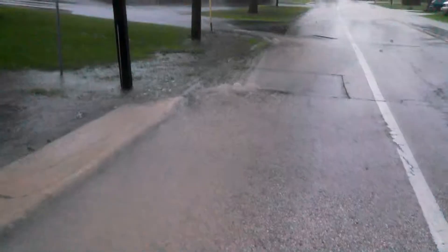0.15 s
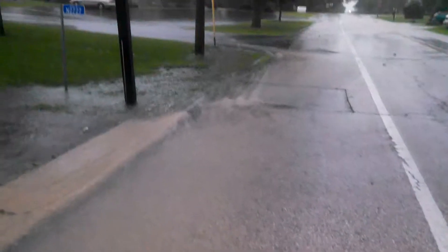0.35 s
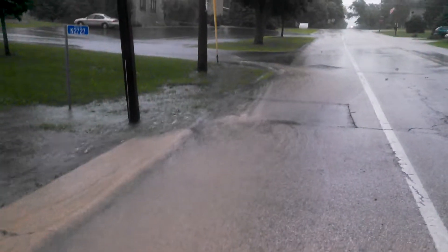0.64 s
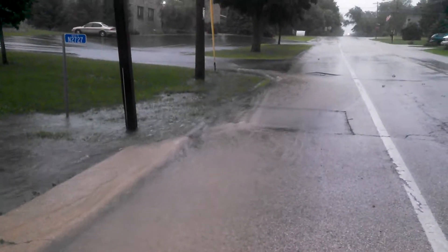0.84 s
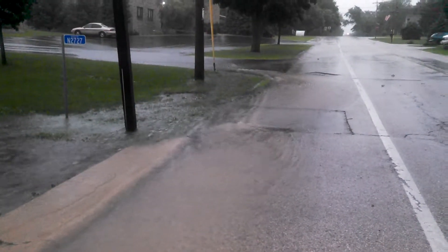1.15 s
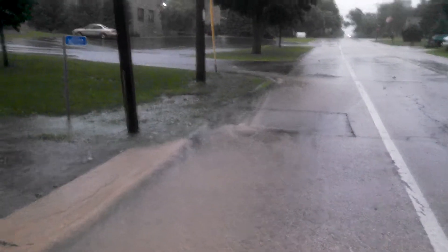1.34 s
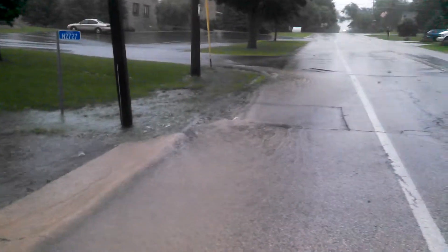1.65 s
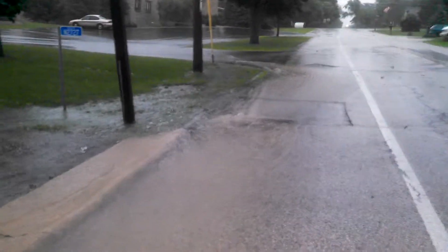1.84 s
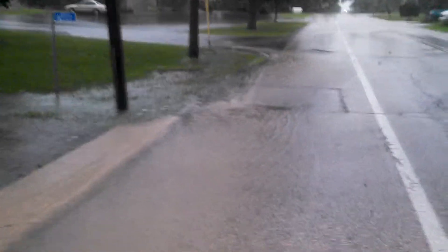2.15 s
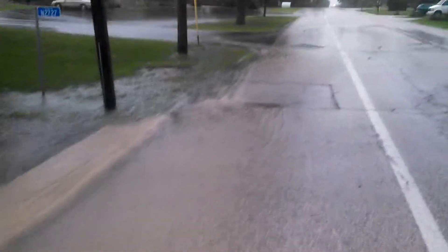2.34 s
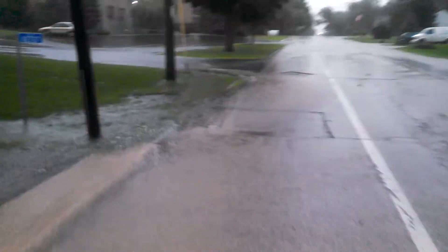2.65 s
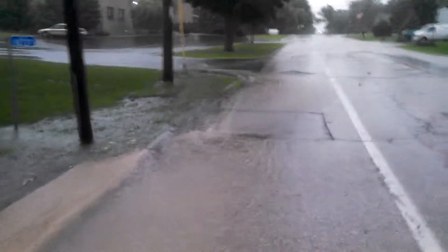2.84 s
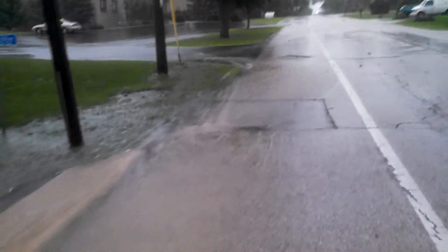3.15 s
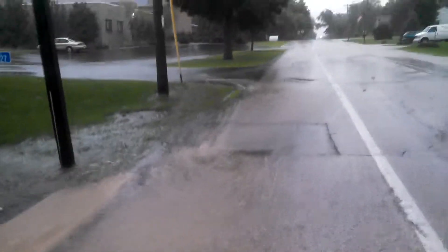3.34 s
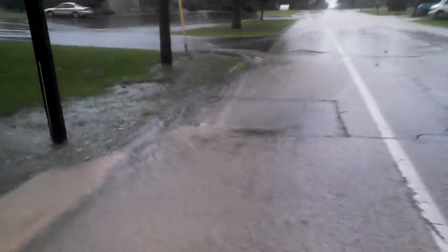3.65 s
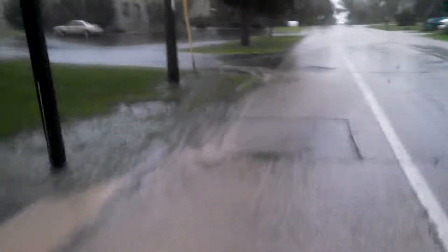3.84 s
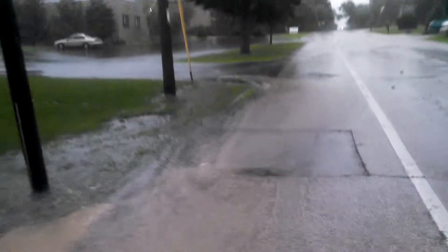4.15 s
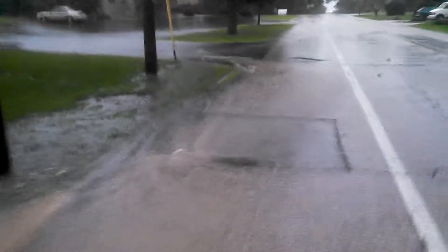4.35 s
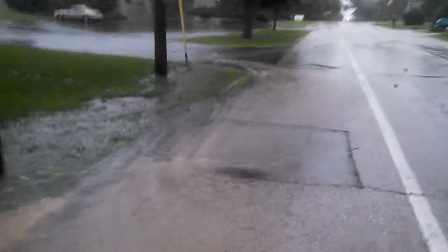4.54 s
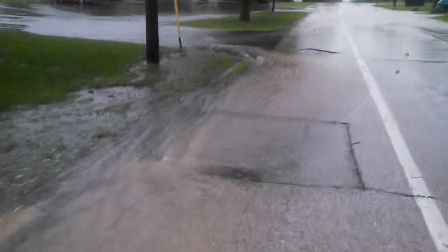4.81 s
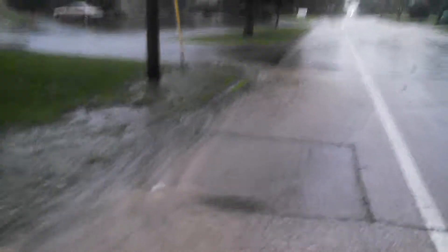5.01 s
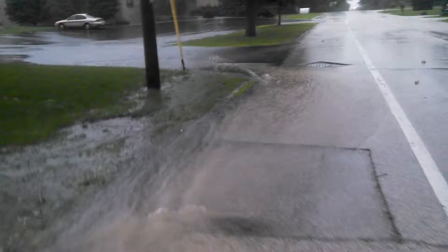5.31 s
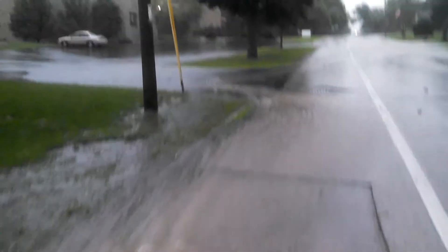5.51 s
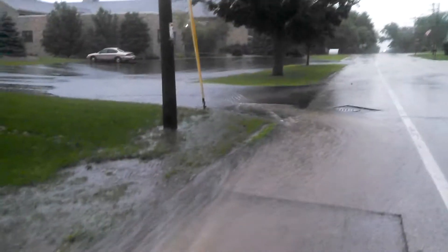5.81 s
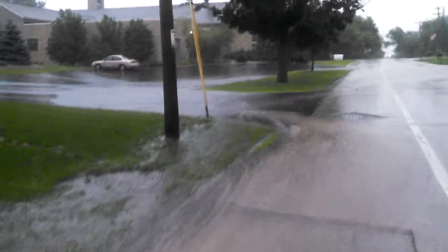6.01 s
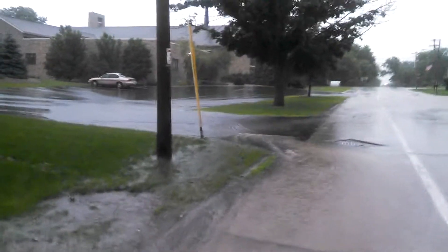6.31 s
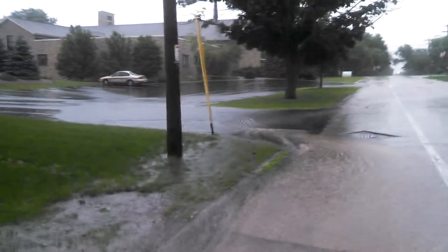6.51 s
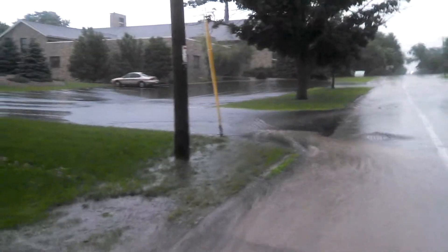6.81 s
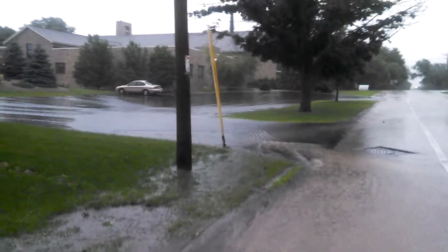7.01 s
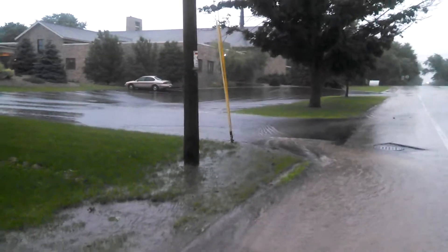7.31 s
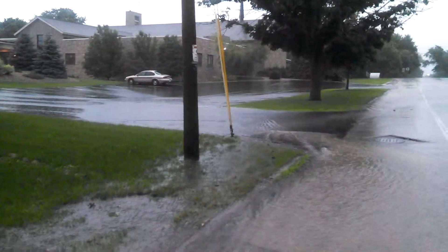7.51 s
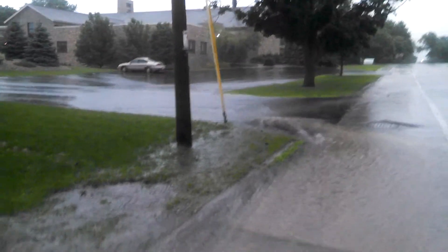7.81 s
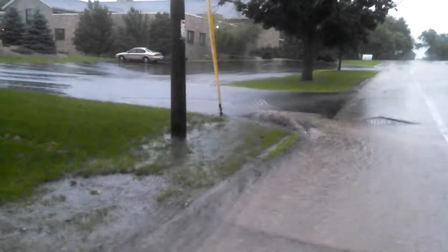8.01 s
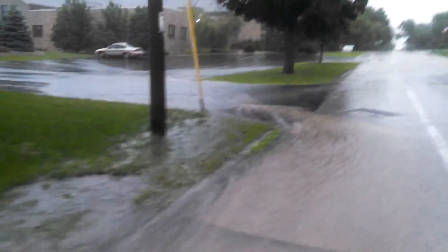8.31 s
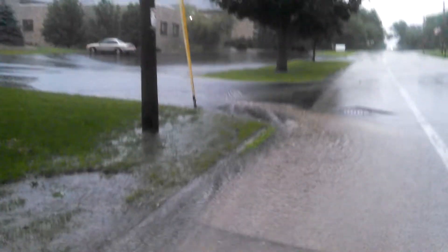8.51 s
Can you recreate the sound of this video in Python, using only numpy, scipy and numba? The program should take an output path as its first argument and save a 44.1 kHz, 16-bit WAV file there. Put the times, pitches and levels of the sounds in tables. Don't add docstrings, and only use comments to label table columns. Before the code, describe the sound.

A short silence, then heavy rain bursts in at full strength. Dense small drops drum on umbrella cloth right over the microphone, with irregular hard thuds, ticks and occasional bright spray from the rim. A steady hiss of rain on flooded road and grass surrounds it, and low wind puffs bump the microphone. The hardest drop, past the middle, briefly pushes the level down.

```python
import sys
import numpy as np
from scipy import signal
from scipy.fft import rfft, irfft
from scipy.io import wavfile
from scipy.ndimage import uniform_filter1d
from numba import njit

SR = 44100
rng = np.random.default_rng(int(sys.argv[2]) if len(sys.argv) > 2 else 0)


def to_wav(sig):
    pcm = np.clip(np.atleast_2d(sig), -1, 1) * 32767
    pcm = np.round(pcm).astype(np.int16)
    wavfile.write(sys.argv[1], SR, pcm.T)


def linear_from_db(decibels):
    return 10 ** (np.asarray(decibels, float) / 20)


N = 381906
T = np.arange(N) / SR
HZ = np.maximum(np.arange(N // 2 + 1) * SR / N, 1)
START_S = .7657
LEFT_LAG = 18


def along(table, column):
    table = np.array(table, float)
    return np.interp(np.log(HZ), np.log(table[:, 0]), table[:, column])


def colour(x, table):
    return irfft(rfft(x) * linear_from_db(along(table, 1)), N)


def unit(x, lo_hz, hi_hz):
    power = np.abs(rfft(x)[(HZ > lo_hz) & (HZ < hi_hz)]) ** 2
    return x * N / np.sqrt(2 * power.sum())


def walk(rate):
    hold = int(SR / rate)
    steps = np.repeat(rng.standard_normal(N // hold + 1), hold)
    return 1.32 * uniform_filter1d(uniform_filter1d(steps, hold), hold)[:N]


@njit
def grains(s, hz, cycles, size, rise):
    out = np.zeros(N + 8192)
    for k in range(len(s)):
        w = 2 * np.pi * hz[k] / SR
        first = max(int(s[k] * SR - rise / w), 0)
        fade = np.exp(-hz[k] / (cycles * SR))
        env = size[k]
        for n in range(min(int((6 * cycles * 2 * np.pi + rise) / w), 6000)):
            if n * w > rise:
                env *= fade
            out[first + n] -= np.sin(n * w) * env * min(n * w / rise, 1.) ** .7
    return out[:N]


def thuds(s, db, hz, ring, ripple_db, ripple_s, facing, count=7):
    chance = rng.random((len(s), count, 3))
    late = ripple_s * (.2 - np.log(1 - .98 * chance[..., 0]))
    late[:, 0] = 0
    back = linear_from_db(ripple_db) * np.exp(-late / ripple_s / 3.16) * (2 * chance[..., 1] - 1)
    back[:, 0] = 1 if facing else 0.23 * back[:, 0]
    pitch = hz[:, None] * 2 ** (1.5 * (chance[..., 2] - .45) * (late > 0))
    when = np.clip(s[:, None] + late, 0, N / SR)
    size = linear_from_db(db)[:, None] * back
    return grains(when.ravel(), pitch.ravel(), 1. * ring, size.ravel(), 1.5 * np.pi)


# time in seconds, patter level in dB, wind level in dB.
WEATHER = [(.77, -28, -47), (1.1, -27.5, -48), (1.4, -29, -46), (1.73, -30.5, -47.5), (2.2, -25, -47),
           (2.55, -28, -49), (3.1, -32, -50), (3.34, -29, -45), (3.65, -31.5, -54), (4.3, -30.5, -50),
           (4.66, -29.5, -52), (4.9, -30, -60), (5.24, -28, -50), (5.7, -31, -52), (6.1, -26.5, -56),
           (6.95, -30.5, -54), (7.5, -28.5, -49.5), (8.66, -30.5, -51)]


def weather():
    s, patter_db, wind_db = np.transpose(WEATHER)
    return np.interp(T, s, patter_db), np.interp(T, s, wind_db)


def small_drops():
    chance = rng.random((2400, 3)).T
    return chance[0] * N / SR, -5.0 * np.log(1 - .88 * chance[1]), 560 * 2 ** (1.8 * chance[2])


def patter(s, db, hz, facing):
    taps = thuds(s, db, hz, ring=.4, ripple_db=-5, ripple_s=.003, facing=facing, count=4)
    return unit(taps, 400, 2000)


# frequency in Hz, level in dB per Hz.
HISS_SPECTRUM = [(60, 0.5), (170, 0), (400, 3), (1000, 2), (2000, -4.5), (3500, -4), (5000, -7.5),
                 (7400, -14), (10000, -18.5), (14000, -23.5), (16000, -53)]


def hiss():
    tick_size = linear_from_db(-3.0 * np.log(1 - .9 * rng.random(N)))
    ticks = rng.standard_normal(N) * tick_size * (rng.random(N) < .03)
    noise = rng.standard_normal(N) + 0.74 * ticks / ticks.std()
    bins = rfft(colour(noise, HISS_SPECTRUM))
    swell, out = walk(30), 0
    for octave in range(6, 15):
        band = np.clip(1 - np.abs(np.log2(HZ) - octave), 0, 1)
        out = out + irfft(bins * band, N) * linear_from_db(1.4 * swell + 1.08 * walk(35))
    return unit(out, 7780, 9740)


# peak time in seconds, peak level in dB, pitch in Hz.
WIND_BUMPS = [(1.101, -12, 89), (1.258, -21, 93), (1.308, -17, 87), (1.457, -13, 80), (2.491, -14, 86),
              (3.181, -27, 80.9), (3.245, -12, 87), (3.298, -6, 103), (4.2, -21, 88), (4.395, -17, 122),
              (4.832, -15, 88), (4.996, -15, 74), (5.204, -14, 88), (5.256, -16, 70), (5.296, -6, 100),
              (5.343, -19, 81), (5.752, -9, 99), (8.2, -21, 80)]


def wind(db):
    flutter = [(25, -50), (50, -19.0), (85, 4.0), (140, -18), (260, -8), (600, -37.0)]  # Hz, dB
    air = colour(rng.standard_normal((2, N)), flutter)
    air = air * linear_from_db(db + 3.0 * walk(15)) / np.std(air)
    s, bump_db, hz = np.transpose(WIND_BUMPS)
    right = air[0] + grains(s, hz, 0.41, linear_from_db(bump_db - 6.0), 3.5 * np.pi)
    left = -.53 * np.roll(right, LEFT_LAG) + 0.11 * air[1]
    return np.array([left, right])


def big_drops(s, db, hz, facing):
    body = thuds(s, db, hz, ring=0.58, ripple_db=-3.5, ripple_s=.004, facing=facing)
    tick = thuds(s - .0001, db - 7, 2.1 * hz, ring=.5, ripple_db=-8, ripple_s=.0025, facing=True)
    sag = thuds(s + 0.0027, db - 13.5, 300 + 0 * hz, ring=0.69, ripple_db=0.0, ripple_s=0.00616,
                facing=facing, count=3)
    spray = thuds(s, db - 26, 6500 + 0 * hz, ring=0.37, ripple_db=17, ripple_s=0.0017, facing=facing)
    return body + tick + sag + spray


def strays(hard_s, count=165):
    over_patter_db, scatter_db, centre_hz, spread_octaves = 17.5, 6.5, 1014, 0.23
    hush_s = .014
    chance = rng.random((count, 2)).T
    s = START_S + (np.arange(count) + chance[0]) / count * (N / SR - START_S)
    db = np.interp(s, *np.transpose(WEATHER)[:2]) + over_patter_db + scatter_db * (2 * chance[1] - 1)
    hz = centre_hz * 2 ** (spread_octaves * rng.standard_normal(count))
    alone = np.abs(s[:, None] + hush_s / 2 - hard_s).min(axis=1) > hush_s
    return np.array([s, db, hz])[:, alone]


# time in seconds, peak level in dB, thud pitch in Hz.
HARD_DROPS = [(0.776, -12, 900), (0.8571, -8.5, 1090), (1.101, -5.5, 960), (1.1533, -9.5, 1370),
              (1.1903, -8, 760), (1.2509, -8.5, 1030), (1.2814, -4, 990), (1.6408, -8, 1140),
              (1.8313, -7.5, 970), (2.0077, -8, 1020), (2.0927, -7, 960), (2.2691, -7, 880),
              (2.4959, -5.5, 1034), (2.822, -9, 1070), (2.9519, -7, 940), (3.251, -4.5, 785.4),
              (3.5872, -3.5, 990), (3.6362, -7, 950), (3.7715, -9, 950), (3.8377, -10, 940),
              (4.0499, -6, 1018), (4.2922, -6.5, 1000), (4.483, -7, 1220), (4.7998, -8, 880),
              (5.4012, -9, 1290), (6.3759, -4, 930), (7.1053, -6.5, 1020), (7.137, -6, 987),
              (7.4632, -5.5, 1020), (8.2852, -11, 1120)]
# time in seconds, peak level in dB.
SLACK_DROPS = [(.8076, -13), (.8822, -9), (1.0791, -10.5), (1.7874, -9), (1.8643, -7.5), (2.1145, -12),
               (2.1526, -9.7), (2.1926, -6.5), (2.2165, -10), (2.248, -11.5), (2.3786, -10), (3.205, -13.5),
               (3.891, -8), (3.9747, -7), (4.1989, -11.5), (4.3415, -10.5), (4.5596, -6), (5.2611, -10),
               (5.4451, -8.5), (5.962, -9), (6.1064, -8), (7.2716, -13), (7.3243, -6.5), (7.5993, -14),
               (7.6749, -10.5), (7.7108, -7.5), (7.8475, -9.5), (7.9368, -7), (8.118, -9), (8.509, -13)]
# time in seconds, thud level in dB, thud pitch in Hz, burst level in dB.
RIM_DROPS = [(1.2649, -4.5, 880, -25), (1.3408, -12, 1310, -23), (1.4793, -11.5, 1000, -15),
             (1.6604, -9.5, 1230, -24), (2.5499, -6.5, 760, -22), (2.559, -6.5, 980, -26),
             (2.7734, -5.5, 1000, -18), (2.894, -3.5, 890, -27), (3.3376, -2.2, 740, -27),
             (3.939, -7, 970, -27), (3.946, -12, 893, -28), (4.1282, -11.5, 1610, -35),
             (4.3921, -9, 358, -42), (4.5939, -6.5, 1070, -29), (4.6204, -9, 1280, -28),
             (4.658, -8.5, 1130, -28), (4.7288, -11.5, 840, -19), (4.933, -9, 960, -17),
             (5.3006, -6.5, 1030, -28), (5.5812, -11.5, 794, -22), (5.7378, -4, 740, -26),
             (5.7515, 4.5, 710, -13), (6.0515, -10, 1160, -23), (6.5015, -6.5, 980, -23),
             (6.643, -7, 961, -28), (6.7092, -9, 1090, -22), (7.0011, -6, 880, -18),
             (7.5751, -9.5, 1140, -23), (8.2057, -7, 1291, -19), (8.261, -22, 1190, -19.5)]


def all_drops():
    slack = np.transpose([(s, db, 740) for s, db in SLACK_DROPS])
    hard = np.hstack([np.transpose(HARD_DROPS), np.transpose(RIM_DROPS)[:3], slack])
    return np.hstack([hard, strays(hard[0])])


def rim_bursts():
    s, _, _, burst_db = np.transpose(RIM_DROPS)
    return s, burst_db, 4530 * 2 ** (0.4 * rng.random(len(s)))


def splashes(s, db, hz):
    ring = thuds(s, db + 2.5, hz, ring=2.0, ripple_db=2, ripple_s=0.00091, facing=True)
    spray = thuds(s - .001, db + 3, 11000 + 0 * hz, ring=0.64, ripple_db=-3, ripple_s=.0018, facing=False)
    return ring + spray


# frequency in Hz, gain in dB.
CLOTH_TONE = [(60, -22), (150, 1.5), (300, -0.5), (900, -1.5), (1500, 0), (2500, 3.5), (4000, 9.5),
              (8000, -4), (14000, 5)]


def through_cloth(x):
    return colour(x, CLOTH_TONE)


# frequency in Hz, gain in dB, phase in radians, likeness from 0 to 1.
PORT_MATCH = [(100, -6, -2.4, .7), (350, -8.2, -1.7, .55), (600, -6.5, -1.25, .72), (1000, -5.5, -.45, .86),
              (1250, -3.4, .1, .96), (1600, -.5, .62, .97), (1900, 1.5, .7, .85), (2300, .6, .2, .66),
              (2900, .1, .2, .84), (5000, .1, .1, .8), (6500, 0, 0, 1)]


def two_ports(near, other):
    like = np.clip(along(PORT_MATCH, 3), 0, 1)
    mixed = like * rfft(near) + np.sqrt(1 - like ** 2) * rfft(other)
    turn = along(PORT_MATCH, 2) - 2 * np.pi * HZ * LEFT_LAG / SR
    path = -linear_from_db(along(PORT_MATCH, 1)) * np.exp(1j * turn)
    return np.array([irfft(mixed * path, N), near])


def scene():
    patter_db, wind_db = weather()
    hiss_db = -48.5 + 0.53 * (patter_db + 29.5)
    small, drops, bursts = small_drops(), all_drops(), rim_bursts()
    ports = []
    for facing in (True, False):
        struck = big_drops(*drops, facing) + linear_from_db(patter_db - 0.5) * patter(*small, facing)
        ports.append(through_cloth(struck) + linear_from_db(hiss_db) * hiss() + splashes(*bursts))
    return two_ports(*ports) + wind(wind_db + 9)


# time in seconds, depth in dB, recovery in seconds.
LIMITER_DIVES = [
    (3.3405, -8, .008),
    (5.7532, -26, .012),
]


def limiter():
    return sum(db * np.exp(-np.maximum(T - s, 0) / back_s) * (T > s) for s, db, back_s in LIMITER_DIVES)


# time in seconds, depth in dB.
GAIN_FALLS = [(0.767, -5.5), (2.28, -4), (2.561, -3.5), (2.9, 1.5), (3.344, -6.5), (4.8, -3.5),
              (5.755, -11.5)]


def gain_control():
    falls = [np.minimum(db + 10 * (T - s), 0) * (T > s) for s, db in GAIN_FALLS]
    return np.min(falls, axis=0)


def roll_off(x):
    return signal.sosfilt(signal.butter(12, 15700, fs=SR, output="sos"), x)


def record(dry):
    clipped = np.clip(dry * linear_from_db(limiter() + gain_control()), -1, 1)
    top_cut = signal.ellip(6, .5, 40, 15480, fs=SR, output="sos")
    heard = signal.sosfilt(top_cut, clipped) * (T > START_S)
    return roll_off(heard)


dry = scene()
out = record(dry)
to_wav(out)
```